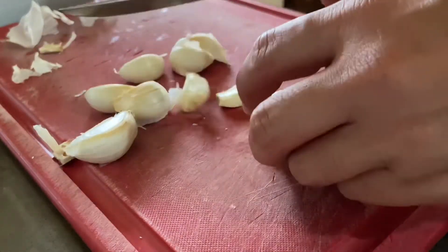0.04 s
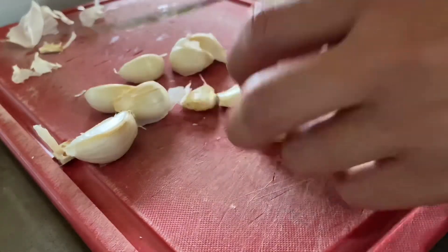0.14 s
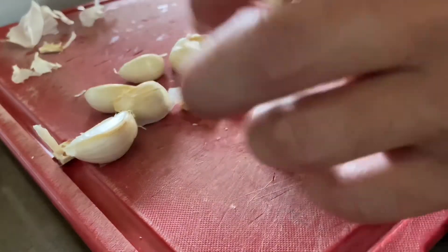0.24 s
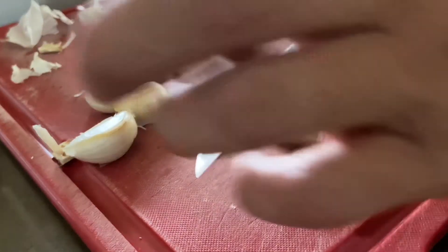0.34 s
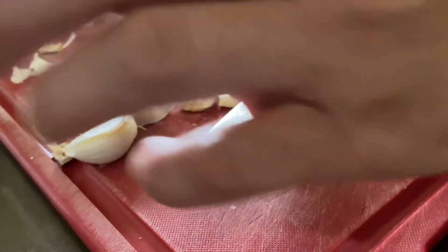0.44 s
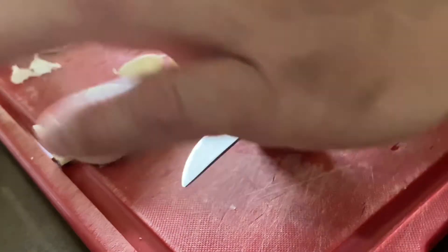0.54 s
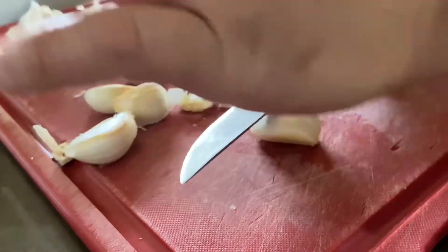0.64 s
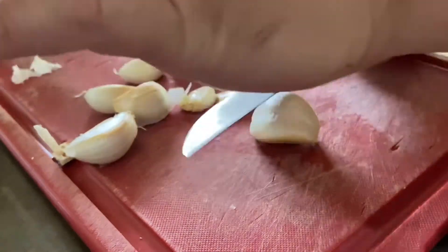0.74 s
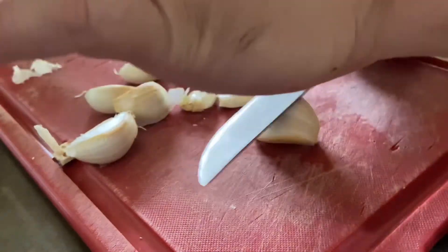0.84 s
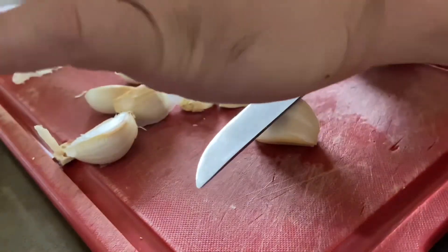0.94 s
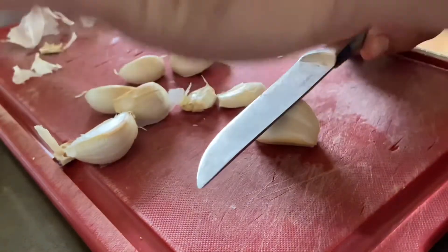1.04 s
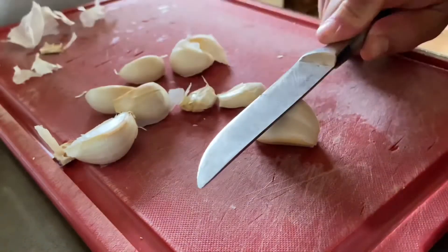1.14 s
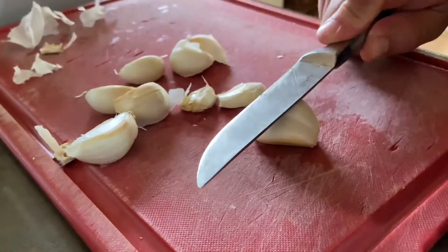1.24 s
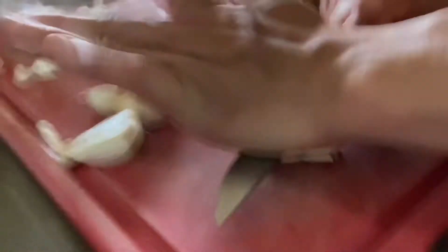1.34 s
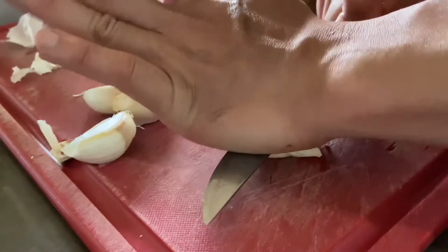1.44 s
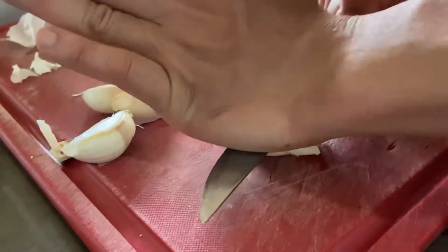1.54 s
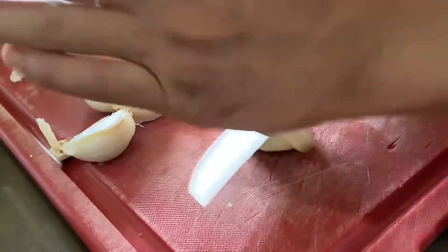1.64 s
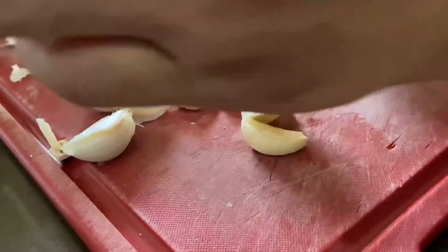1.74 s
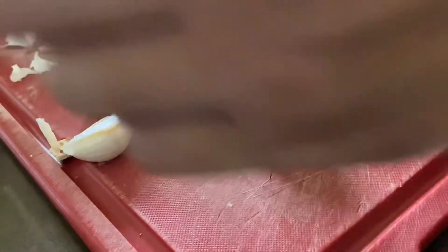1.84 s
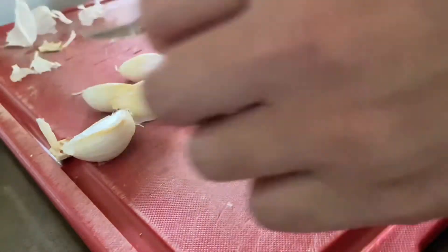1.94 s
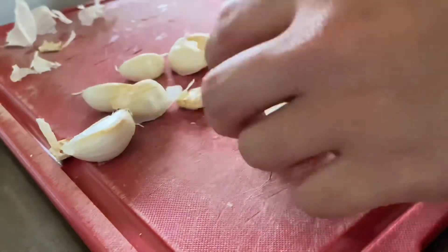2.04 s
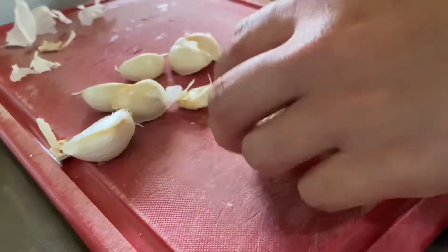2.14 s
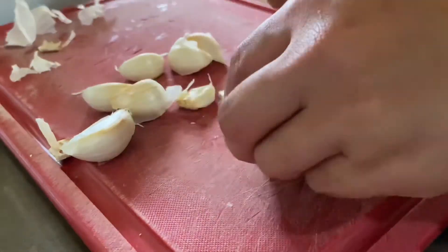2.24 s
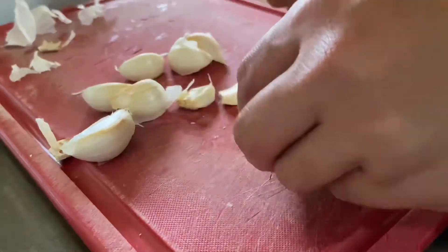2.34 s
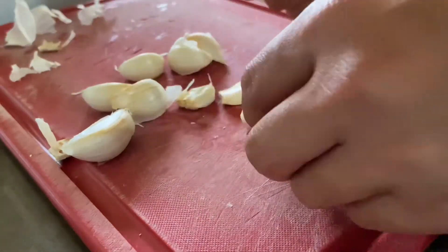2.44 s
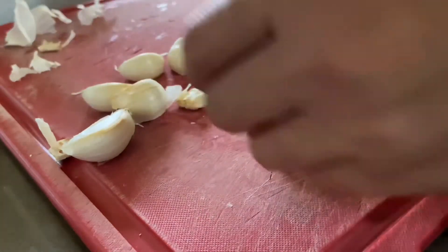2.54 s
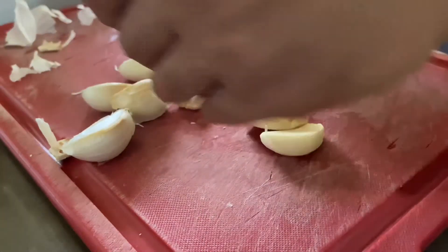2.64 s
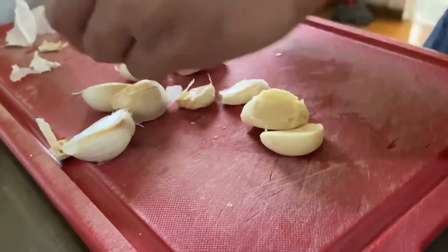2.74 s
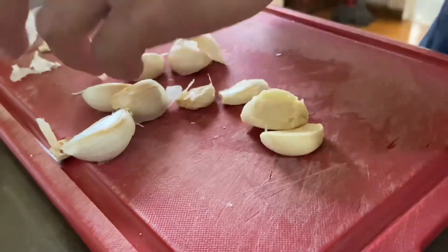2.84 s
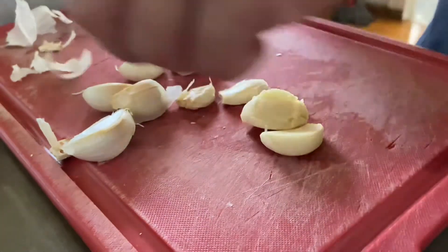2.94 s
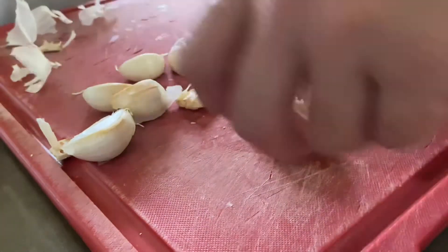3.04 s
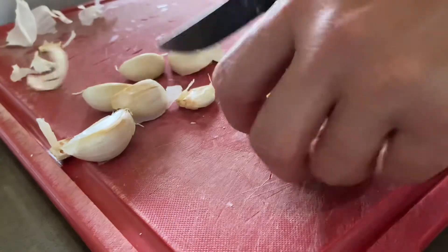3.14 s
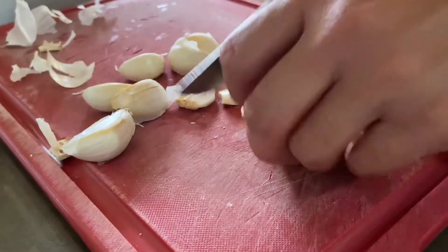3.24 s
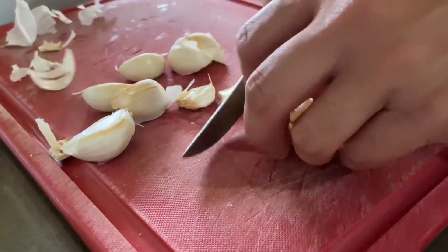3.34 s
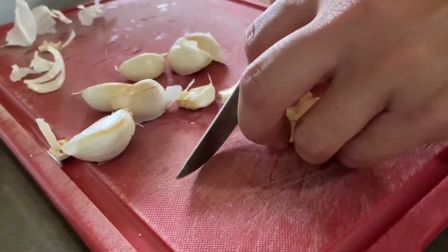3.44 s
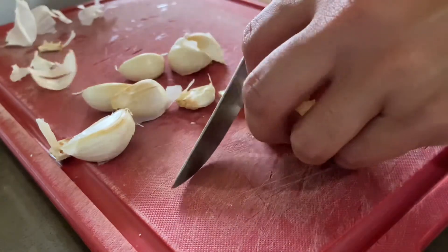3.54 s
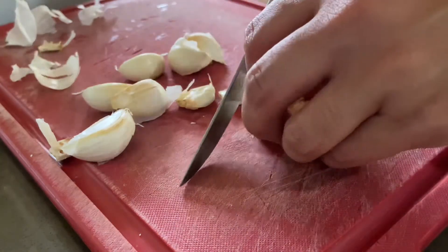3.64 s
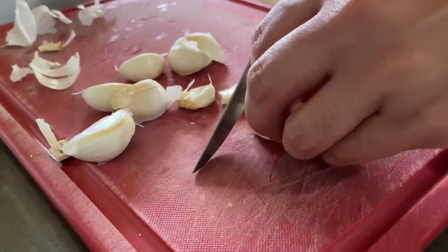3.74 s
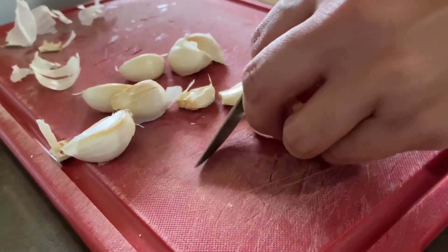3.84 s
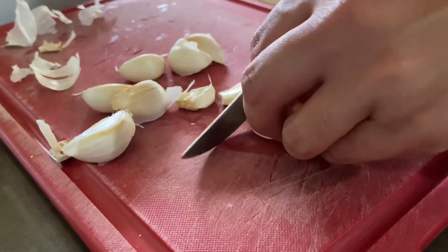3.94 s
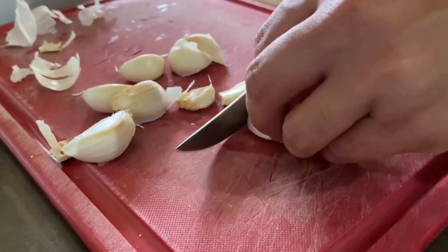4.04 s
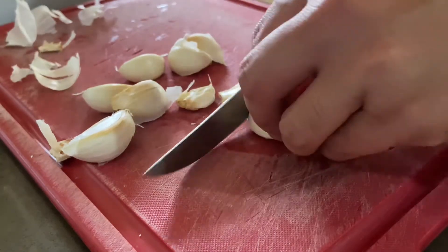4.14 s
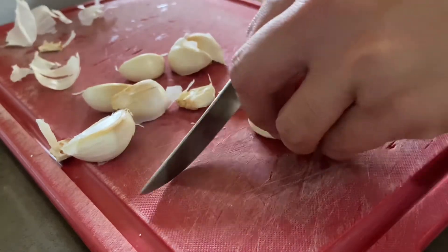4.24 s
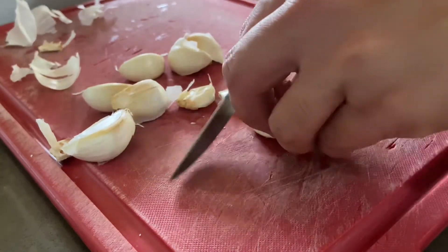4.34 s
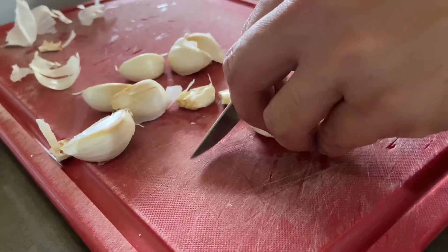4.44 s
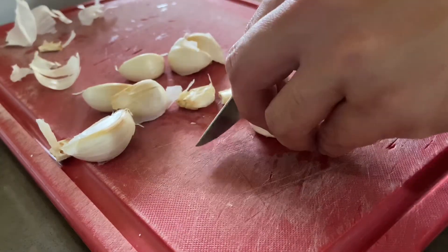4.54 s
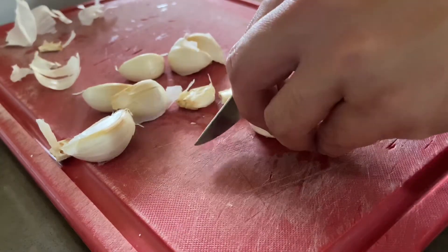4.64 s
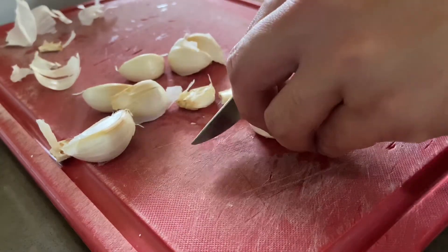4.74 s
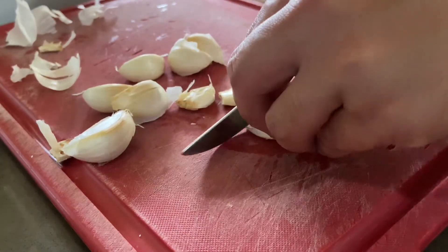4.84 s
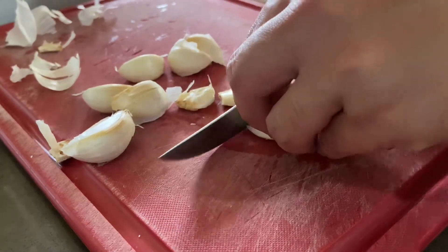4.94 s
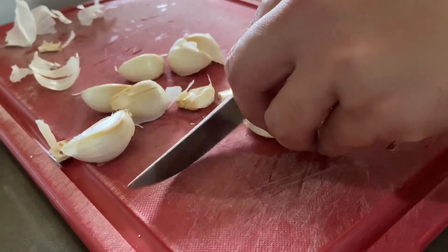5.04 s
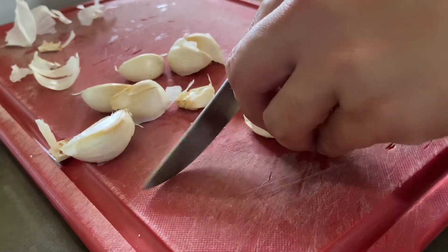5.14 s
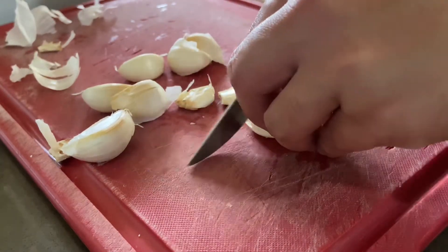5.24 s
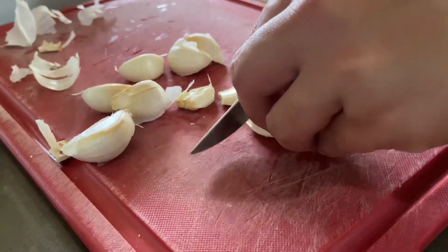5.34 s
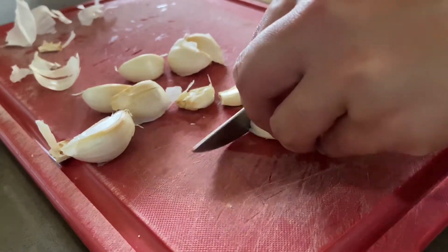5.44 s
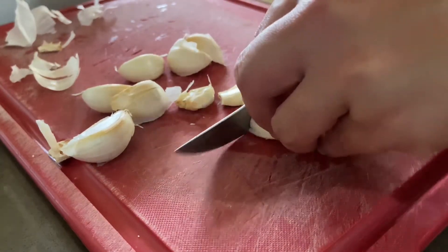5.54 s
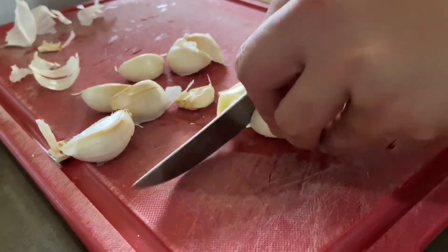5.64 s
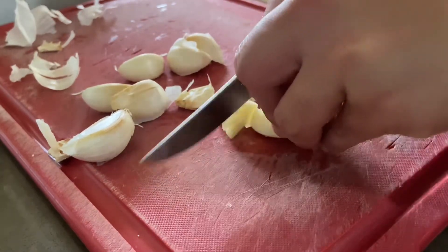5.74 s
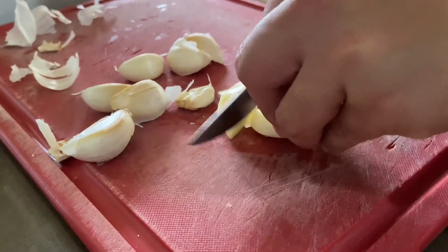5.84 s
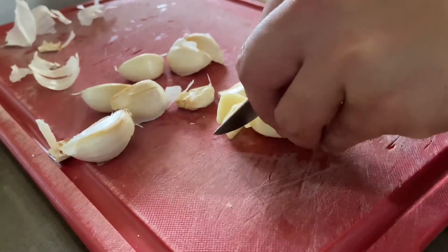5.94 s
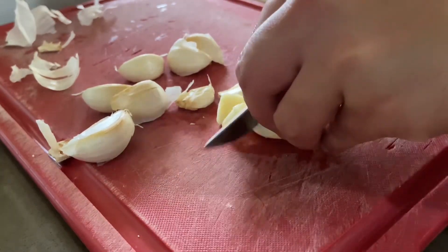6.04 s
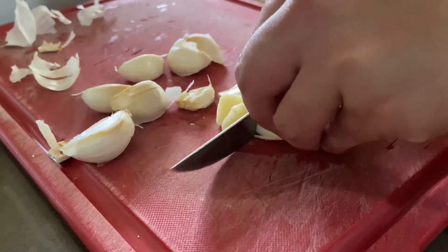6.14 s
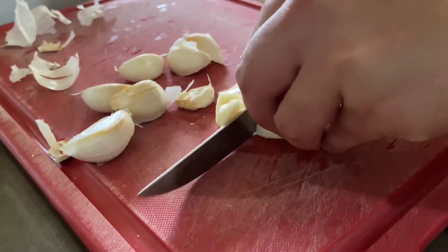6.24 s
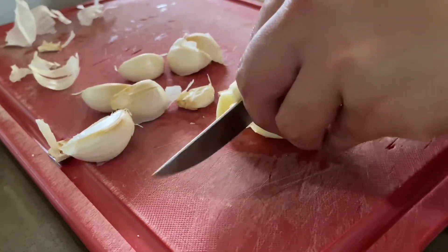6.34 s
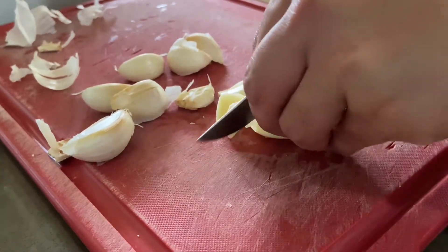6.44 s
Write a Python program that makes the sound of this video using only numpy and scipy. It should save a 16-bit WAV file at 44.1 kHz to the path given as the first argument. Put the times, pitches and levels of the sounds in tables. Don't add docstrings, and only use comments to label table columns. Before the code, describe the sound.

A quiet kitchen, heard very close to a plastic board, with faint low fridge hum, soft airy noise and counter rumble that gradually grow louder. A barely audible touch comes near 0.4 s. At 1.3 s a garlic clove is crushed: a tight run of dry cracks, a dull puff of air and a low counter thud, with a short room tail. From 1.5 to 2.9 s there are tiny papery ticks, gentle rubbing and very faint squeaks. At 3.3 s the blade knocks hard with a slight steely ring. Small clatters and a sharp fibre snap follow around 3.9 s, then a duller knock at 4.4 s. A crunchy cut lands at 4.8 s, then skin crackle at 5.0 s. The strongest chop hits at 5.4 s with wet snapping and scraping; another crunches and knocks at 6.0-6.1 s, before light rubbing fades into the hum.

```python
import sys
import numpy as np
from scipy import signal
from scipy.fft import rfft, irfft, next_fast_len
from scipy.io import wavfile
from scipy.ndimage import uniform_filter1d

SR = 44100
rng = np.random.default_rng(int(sys.argv[2]) if len(sys.argv) > 2 else 0)


def boost(x):
    u = np.asarray(x, float) / 20
    return 10 ** u


def dump(signal):
    limited = np.clip(np.atleast_2d(signal).T, -1, 1)
    pcm = np.round(limited * 32767).astype(np.int16)
    wavfile.write(sys.argv[1], SR, pcm)


N = 285327


def evened(x):
    return x / np.sqrt(np.mean(x ** 2) + 1e-20)


def read(points, hz):
    f, value = np.transpose(points)
    return np.interp(np.log(hz + 1), np.log(f + 1), value)


def add(mix, s, sound):
    part = mix[max(round(s * SR), 0):][:len(sound)]
    part += sound[:len(part)]


def colour(x, points, tilt_db=0., centre_hz=8000):
    size = next_fast_len(x.shape[-1], True)
    hz = np.fft.rfftfreq(size, 1 / SR)
    octaves = np.log2(np.maximum(hz / centre_hz, 1 / 4))
    gain = boost(read(points, hz) - tilt_db * octaves)
    return irfft(rfft(x, size) * gain, size)[..., :x.shape[-1]]


# f/Hz, coherence [-1 to 1]
COHERENCE = [(60, 1), (180, 0.68), (550, -0.035), (1650, -0.031), (4970, 0.57), (15000, -0.076)]


def wash(spectrum, patchy_db):
    frames, hz = N // 512 + 5, np.fft.rfftfreq(2048, 1 / SR)
    a, b, c, d, patches = rng.standard_normal((frames, 1025, 5)).T
    patches = uniform_filter1d(patches, 6, 0)
    patches = evened(uniform_filter1d(patches, 8, 1))
    same = np.clip(read(COHERENCE, hz), -1, 1)[:, None]
    left = a + 1j * b
    right = same * left + np.sqrt(1 - same ** 2) * (c + 1j * d)
    z = np.array([left, right]) * boost(read(spectrum, hz)[:, None] + patchy_db * patches)
    return evened(signal.istft(z, nperseg=2048, noverlap=1536)[1][:, :N])


# f/Hz, level/dB
HUM_LINES = [(118.4, -74.5), (360.7, -72.5), (522.2, -80.5), (1066, -85.5), (1244, -89), (1836, -98)]


def fridge_hum(waver_db=2.0, waver_rad=0.94):
    t = np.arange(N) / SR
    hum = np.zeros((2, N))
    for hz, db in HUM_LINES:
        slow = uniform_filter1d(rng.standard_normal(N), 3000)
        waver = evened(uniform_filter1d(slow, 3000))
        between_ports = np.array([[0], [1.3]]) * hz / 360
        phase = 2 * np.pi * hz * t + waver_rad * waver + between_ports
        hum += boost(db + 76 + waver_db * waver[::-1]) * np.sqrt(2) * np.sin(phase)
    return hum


# f/Hz, density level/dB per Hz
AIR_NOISE = [(120, -44), (200, -13), (260, -22.5), (360, -16), (442, -22.5), (513, -20), (900, -25.5),
             (1270, -31), (1900, -37.5), (2300, -42.5), (2900, -41), (5000, -43), (10000, -48.5),
             (16500, -43)]
# f/Hz, density level/dB per Hz
COUNTER_RUMBLE = [(12, -65), (20, -39.5), (34, -17), (48, -2), (69, 7), (86, -15.5), (102, -1.5), (123, 2),
                  (229, -2.5), (300, -24.5), (390, -45), (660, -120)]
# t/s, gain as hum level/dB, weight of the hands on the counter/dB
RECORDER_GAIN = [(0.0, -71.5, 10), (0.7, -72, 8.5), (1.33, -72, 7.5), (1.51, -63, 6), (1.85, -68.5, 8.5),
                 (2.23, -67.5, 7.5), (2.83, -66.5, 10.5), (3.299, -65.5, 6), (3.948, -64, 9), (4.9, -60, 7),
                 (5.26, -58, 4.5), (5.45, -57.5, 6.5), (5.86, -59.5, 9.5), (6.16, -57.5, 6),
                 (6.47, -59.5, 5.5)]


def background(air_db=4.5):
    t = np.arange(N) / SR
    s, gain_db, hands_db = np.transpose(RECORDER_GAIN)
    air = fridge_hum() + boost(air_db) * wash(AIR_NOISE, patchy_db=2.65)
    air_gain = boost(np.interp(t, s, gain_db))
    rumble_gain = boost(np.interp(t, s, gain_db + hands_db))
    return air_gain * air + rumble_gain * wash(COUNTER_RUMBLE, patchy_db=1.5)


def swells(rows, fade_db=20):
    t, power = np.arange(0, N + 64, 64) / SR, 0
    for s, rise, fall, *db in rows:
        away = np.maximum((s - t) / max(rise, .005), (t - s) / max(fall, .005))
        power = power + boost(np.array(db)[:, None] - fade_db * away) ** 2
    return [np.interp(np.arange(N) / SR, t, np.sqrt(row)) for row in power]


# f/Hz, level/dB
CRACK_SPECTRUM = [(300, -37.5), (1000, -13.5), (2000, -15.5), (3000, -12), (4200, -5.5), (5500, -3),
                  (7000, -3), (9000, 2), (11000, -1), (13000, -1), (15000, -4.5), (17000, -10)]
# f/Hz, level/dB
FLESH_SPECTRUM = [(600, -25.5), (1300, -9.5), (2200, -9), (3300, -10), (4800, 1), (6500, -2.5),
                  (9000, -14.5), (14000, -14)]
# f/Hz, level/dB
SCRAPE_SPECTRUM = [(300, -23.5), (900, -1), (1500, 2), (2100, -21), (2700, -6.5), (3800, -7.5), (5000, -12),
                   (6500, -16.5), (9000, -30), (14000, -36)]
# strongest t/s, rise t/s, fall t/s, hiss level/dB, scrape level/dB
RUB_STROKES = [(.05, 0.031, 0.071, -64.5, -75), (1.334, 0.019, 0.091, -49.5, -45),
               (1.45, 0.063, 0.15, -68, -68), (1.64, 0.17, 0.053, -63, -70),
               (1.82, 0.078, 0.044, -66.5, -74), (2.261, 0.06, 0.02, -55, -67),
               (2.38, 0.24, 0.095, -72, -76), (2.6, 0.11, 0.19, -72.5, -85.5),
               (2.86, 0.085, 0.31, -77, -71.5), (3.24, 0.15, 0.62, -72, -72), (3.87, 0.054, .3, -67, -64.5),
               (3.97, 0.068, 0.022, -66, -53), (4.1, 0.12, 0.14, -63, -58),
               (4.8, 0.017, 0.12, -49.5, -38.5), (4.941, 0.15, 0.072, -51.5, -75),
               (5.17, 0.13, 0.16, -63.5, -56), (5.431, 0.0071, 0.024, -31.5, -24.5),
               (5.41, 0.014, 0.061, -42.5, -35), (5.52, 0.076, 0.26, -77, -40.5),
               (5.6, 0.13, 0.064, -51.5, -45.5), (6.015, 0.017, 0.18, -55.5, -50),
               (6.076, 0.064, 0.019, -51, -47.5), (6.17, 0.1, 0.081, -50.5, -67.5),
               (6.24, 0.28, 0.019, -55.5, -76)]
# strongest t/s, rise t/s, fall t/s, crunch level/dB
CLOVE_CUTS = [(1.36, 0.031, 0.23, -51), (3.85, 0.015, 0.11, -61), (3.96, 0.026, 0.19, -50),
              (4.04, 0.018, 0.14, -64), (4.79, 0.0087, .05, -48), (5.4, .02, 0.049, -46),
              (5.413, .015, .03, -44), (5.426, .012, .03, -44), (6.002, .006, 0.017, -50.5),
              (6.018, .012, 0.027, -45), (6.032, .012, 0.054, -39.5), (6.045, .03, 0.061, -44),
              (6.074, .025, 0.013, -41)]


def rubs(grains_per_s=6000, lumpy_db=3):
    loudness = boost(lumpy_db * np.minimum(rng.exponential(1, N), 4))
    grains = loudness * (rng.random(N) < grains_per_s / SR)
    tears = evened(grains * rng.standard_normal(N))
    smooth = rng.standard_normal(N)
    hiss = evened(colour(tears + 0.9 * smooth, CRACK_SPECTRUM))
    crunch = evened(colour(tears[::-1] + 0.54 * smooth, FLESH_SPECTRUM))
    scrape = evened(colour(smooth[::-1] + 0.65 * tears, SCRAPE_SPECTRUM))
    hiss_gain, scrape_gain = swells(RUB_STROKES)
    crunch_gain = swells(CLOVE_CUTS)[0]
    return hiss_gain * hiss + scrape_gain * scrape + crunch_gain * crunch


HOLLOW_HZ, HOLLOW_OCTAVES = 1120, .15


def struck(events, modes, length_s, centre_hz, spread, spread_db, rise, twin_db):
    out, t = np.zeros(N), np.arange(round(length_s * SR)) / SR
    hz, mode_db, t60 = np.transpose(modes + modes)[:, :, None]
    twin = (np.arange(len(hz)) >= len(modes))[:, None]
    hollow = np.exp(-(np.log2(hz / HOLLOW_HZ) / HOLLOW_OCTAVES) ** 2)
    sign = (-1.) ** np.arange(len(hz))[:, None]
    swell = 1 - np.exp(-t * hz / rise)
    chance = rng.standard_normal((len(events), 2, len(hz), 1))
    for (s, db, bright_db, ring, *hollow_db), (a, b) in zip(events, chance):
        level_db = mode_db + twin * twin_db + spread_db * b
        level_db = level_db + bright_db * np.log2(hz / centre_hz) + sum(hollow_db) * hollow
        pitch = hz * (1 + spread * a * (0.3 + twin))
        decay = boost(level_db - 60 * t / (t60 * max(ring, .2)))
        blow = (sign * swell * decay * np.sin(2 * np.pi * pitch * t)).sum(0)
        add(out, s, boost(db + 3.5) * blow / abs(blow).max())
    return out


# f/Hz, level/dB, decay t60/s
BOARD_MODES = [(622, -3.5, 0.021), (842, -10, 0.08), (882.3, -4.3, 0.12), (1048, -6.5, 0.063),
               (1165, -6.5, 0.06), (1366, -2.5, 0.056), (1350, -2, 0.02), (1632, 9, 0.027),
               (2067, -15.5, 0.077), (2654, -9.5, 0.049), (2874, -15.5, 0.012), (3100, 2, 0.033),
               (3654, -15.5, 0.06), (3836, -1, 0.017), (3906, -2.5, 0.032), (4520, -6.5, 0.018),
               (4680, -21.5, 0.081), (6295, -10, 0.019), (7720, -30, 0.0023)]
# t/s, peak level/dB, brightness/dB per octave, ring [factor], hollow modes level/dB
BOARD_KNOCKS = [(0.378, -45, -17.5, 1.05, -5), (0.411, -56, -41, 1.1, -12), (3.3327, -9.5, 2.5, 0.47, 4.5),
                (3.3623, -23.5, -2, .95, 1.5), (3.84, -40, -13.5, 0.601, -4), (3.8507, -30, -7.5, 0.71, 8),
                (3.8744, -40, -3, 0.7, -2), (3.894, -38, -6, 0.45, 11.5), (3.9076, -35.5, -4, 0.89, -1),
                (3.921, -50, -7, .7, 7), (3.954, -33, 7, 0.46, -5), (4.004, -25.5, 3.5, 0.55, -5),
                (4.4056, -17, -5.5, 0.62, 6), (4.7889, -29, 0.5, .95, 4), (4.8212, -8.5, 0.14, 0.55, -2),
                (4.8545, -24.5, -16, 0.62, -8), (5.2571, -28, -8, 0.6, 6.5), (5.3913, -36, -10.5, 0.46, -2),
                (5.4102, -40, -4.5, 0.65, 0.5), (5.4318, -2, 1.5, 0.77, -4.5),
                (5.4631, -32, 4.5, 0.3, -0.5), (6.002, -44.5, -22, 0.66, 3.5),
                (6.0314, -32, -2, 0.66, -0.5), (6.0812, -6, -1, 0.79, 0.5), (6.1096, -35, -4.5, 0.81, -4)]


def board_knocks():
    return struck(BOARD_KNOCKS, BOARD_MODES, length_s=.1, centre_hz=1800, spread=0.029, spread_db=-0.5,
                  rise=0.53, twin_db=-2.0)


# f/Hz, level/dB
RADIATED_SPECTRUM = [(400, -31.5), (760, -7.5), (875, 2.5), (1020, -10.5), (1330, 3.5), (1550, 4),
                     (2050, -14.5), (2700, -11.5), (3100, -9), (3420, -15), (3630, -2.5), (3850, -7),
                     (4200, -5), (4600, -10), (6000, -12), (9000, -28.5), (14000, -41)]


def radiated(gain_db=14):
    out, click = np.zeros(N), signal.unit_impulse(1024, 512)
    for s, db, bright_db, ring, hollow_db in BOARD_KNOCKS:
        blur = colour(click, RADIATED_SPECTRUM, -bright_db, 1800)
        add(out, s - 512 / SR, boost(db + gain_db) * blur / np.linalg.norm(blur))
    return out


def snaps(rows, t60, burst_db):
    out, t = np.zeros(N), np.arange(2048) / SR - .004
    burst = boost(burst_db - 60 * t / max(t60, .002))
    rattle = boost(-18 - 60 * t / 0.021)
    shape = (burst + rattle) * np.clip(t / 0.00017, 0, 1)
    spike = 4.3 * np.exp(-((t - .0003) / .00002) ** 2)
    for (s, db, dull_db), noise in zip(rows, rng.standard_normal((len(rows), len(t)))):
        crack = colour(spike + noise * shape, CRACK_SPECTRUM, dull_db)
        add(out, s - .004, boost(db + 3.0) * crack / abs(crack).max())
    return out


def edge_ticks(edge_db=-3, per_bright=0.96, dull_db=17.5):
    rows = []
    for s, db, bright_db, ring, hollow_db in BOARD_KNOCKS:
        rows.append((s, db + edge_db + per_bright * bright_db, dull_db))
    return snaps(rows, t60=0.0049, burst_db=-3)


# t/s, peak level/dB, dullness/dB per octave
SKIN_TICKS = [(0.3785, -47.5, 0), (1.5525, -37, 6), (1.5795, -29.5, 0), (1.6176, -29, -0.5),
              (1.6371, -39.5, -4), (1.6688, -43, -18.5), (2.1854, -44, -6), (2.2247, -33, -1),
              (2.2974, -41, 1), (2.3578, -44, -21), (2.5705, -47.5, -3), (2.726, -47.5, -1.5),
              (2.8449, -33, 8), (3.2924, -45.5, -4), (3.3326, -29, -12.5), (3.8985, -30.5, 2.5),
              (3.906, -39, 2), (3.9419, -25.5, 2.5), (4.1579, -23, -10), (4.1642, -29, -8),
              (4.948, -32, -7.5), (4.9887, -15, -3), (5.0008, -33.5, 4), (5.2552, -31, -1),
              (5.2948, -35, 1), (5.5522, -16, -8.5), (5.606, -27.5, -7.5), (5.6361, -38, -15),
              (6.2678, -28, -20.5)]


def skin_ticks():
    return snaps(SKIN_TICKS, t60=0.0029, burst_db=-6)


# f/Hz, level/dB, decay t60/s
COUNTER_MODES = [(56.7, -3.1, 0.26), (80, -14, 0.15), (107.5, -6.5, 0.18), (161.5, -3, .08),
                 (235.3, -11.5, 0.04), (299.4, -32.5, 0.038), (460, -25.5, 0.02)]
# t/s, peak level/dB, brightness/dB per octave, ring [factor]
COUNTER_THUDS = [(.385, -41.5, -0.5, 0.59), (1.327, -17.5, 15.5, 0.56), (1.333, -15, -2, 0.54),
                 (1.44, -37, 5.5, 0.64), (3.335, -38, 11.5, 1), (3.861, -44.5, 5.5, 0.95),
                 (3.891, -45.5, 10.5, 0.78), (4.008, -34, -0.5, 0.8), (4.4, -39, 9, 0.99),
                 (4.797, -37, 6, 1), (4.912, -35.5, -19, 0.36), (5.26, -37.5, 13.5, 0.58),
                 (5.43, -31.5, 7.5, 0.76), (5.49, -29.5, 3, 0.86), (5.59, -37.5, -6.5, 1),
                 (6.03, -39.5, -1, 1), (6.08, -39, 12, 0.58), (6.145, -37.5, -7.5, 0.7)]


def counter_thuds():
    return struck(COUNTER_THUDS, COUNTER_MODES, length_s=.25, centre_hz=90, spread=0.081, spread_db=2.5,
                  rise=0.091, twin_db=-0.5)


# t/s, peak level/dB, dullness/dB per octave
CRUSH_CRACKS = [
    (1.3194, -25.5, 4),
    (1.3235, -11.5, -0.5),
    (1.3245, -0.5, 0),
    (1.3256, -6.5, -4.5),
    (1.3268, -7.5, 3),
    (1.3288, -2.5, 7.5),
    (1.3322, -18, 1.5),
    (1.3821, -33.5, -14),
]


def crush_cracks():
    return snaps(CRUSH_CRACKS, t60=0.00087, burst_db=-4)


# f/Hz, level/dB
SLAP_SPECTRUM = [(200, -25.5), (500, -6.5), (1000, -8), (1600, -2), (2600, -4.5), (4500, -3.5),
                 (7000, -16.5)]
# t/s, level/dB, decay t60/s
FLAT_SLAPS = [
    (1.326, -9.5, 0.041),
    (2.841, -43.5, 0.033),
]


def slaps():
    out, t = np.zeros(N), np.arange(4096) / SR - .01
    for (s, db, t60), noise in zip(FLAT_SLAPS, rng.standard_normal((len(FLAT_SLAPS), len(t)))):
        decay = np.clip(t / 0.00049, 0, 1) * boost(-60 * t / max(t60, .005))
        add(out, s - .01, boost(db) * evened(colour(noise, SLAP_SPECTRUM)) * decay)
    return out


# t/s, length t/s, f/Hz, bandwidth f/Hz, level/dB
SQUEAK_TONES = [
    (1.52, .1, 3230, 90, -66),
    (1.62, .13, 3260, 120, -74),
    (2.066, .025, 6970, 80, -76),
    (5.11, .15, 2570, 330, -59),
    (4.42, .13, 3620, 170, -62),
]


def squeaks():
    out = np.zeros(N)
    chance = rng.standard_normal((len(SQUEAK_TONES), 2, 8000))
    for (s, length, hz, width_hz, db), (a, b) in zip(SQUEAK_TONES, chance):
        t = np.arange(round(length * SR)) / SR
        r = np.exp(-np.pi * width_hz / SR)
        fuzz = signal.lfilter([1], [1, -2 * r, r * r], a + 1j * b)[-len(t):]
        whistle = evened((fuzz * np.exp(2j * np.pi * hz * t)).real)
        add(out, s, boost(db) * whistle * signal.windows.tukey(len(t), .6))
    return out


# f/Hz, level/dB, decay t60/s
BLADE_MODES = [(8080, -15, 0.12), (9000, -6.5, .06), (10080, -13.5, .15), (11090, -10, 0.15),
               (12040, 1, 0.098), (14440, 4, 0.084)]
# t/s, peak level/dB, brightness/dB per octave, ring [factor]
BLADE_PINGS = [
    (3.333, -37.5, 3, 1.4),
    (4.406, -56, -7, 0.66),
]


def blade_pings():
    return struck(BLADE_PINGS, BLADE_MODES, length_s=.1, centre_hz=10000, spread=0.0023, spread_db=3.0,
                  rise=.9, twin_db=-25.0)


# t/s, peak level/dB, dullness/dB per octave
FIBRE_SNAPS = [(3.8405, -47, 7.5), (3.8487, -35, 4), (3.9279, -43.5, -8.5), (3.951, -0.5, -8.5),
               (4.0238, -20.5, 0), (4.03, -10, 2), (4.7885, -19.5, 1), (4.7975, -13, -10.5),
               (4.8066, -10.5, -14), (4.8097, -6, -2), (4.82, -2.5, -4.5), (4.8516, -1.5, -4.5),
               (4.8654, -12.5, -10.5), (4.8761, -13, -12), (5.3817, -31, 5), (5.3916, -30, 7.5),
               (5.4035, -32, -6), (5.4126, -22.5, 2), (5.4248, -13, 2.5), (5.4298, -1, 3), (5.4272, -15, 4),
               (5.4376, -11, 5), (5.4418, -15, -9), (5.4461, -14, -2.5), (5.4491, -19.5, -4),
               (6.0005, -34.5, 6.5), (6.017, -40.5, 6), (6.0322, -23, -12), (6.0775, 6.5, -16),
               (6.0795, -9, -7), (6.0835, -16.5, 0.5)]


def fibre_snaps():
    return snaps(FIBRE_SNAPS, t60=.007, burst_db=-9)


# f/Hz, left minus right level/dB
PORT_SHADE = [(200, 6), (400, -3.5), (800, 2.5), (1500, 9.5), (3300, 13), (5500, 15), (7500, 0),
              (11000, -0.1)]
# f/Hz, phase [radians]
BOARD_PHASE = [(300, 0.43), (950, 0.62), (1400, 1), (2000, 3.06), (2800, 8.4), (3700, 12.6), (6000, 19)]
# f/Hz, phase [radians]
COUNTER_PHASE = [(50, .15), (120, .35), (250, 1.9), (500, 0.62)]
AIR_LAG = 12


def ports(x, lag=0, lead=((1, 0), (2, 0)), shade=1):
    size = next_fast_len(N, True)
    hz = np.fft.rfftfreq(size, 1 / SR)
    half = boost(shade * read(PORT_SHADE, hz) / 2)
    left = half * np.exp(1j * read(lead, hz) - 2j * np.pi * hz * lag / SR)
    return irfft(rfft(x, size) * np.array([left, 1 / half]), size)[:, :N]


# f/Hz, decay t60/s
KITCHEN_DECAY = [(200, 0.74), (700, 0.56), (1500, 0.62), (3500, 0.5), (7000, 0.5), (12000, 0.13)]
# f/Hz, level/dB
ROOM_SHARE = [(60, -29), (200, -12.5), (900, -3), (3500, -9.5), (8000, -19.5), (13000, -22)]


def kitchen(x):
    taps = np.zeros((2, SR))
    at = np.arange(140, SR - 20, 20) + rng.integers(0, 20, (2, (SR - 141) // 20))
    np.put_along_axis(taps, at, rng.choice([-1., 1.], at.shape), 1)
    hz, t, z = signal.stft(taps, SR, nperseg=256)
    decay = boost(-60 * t / read(KITCHEN_DECAY, hz)[:, None])
    tail = signal.istft(z * decay, SR, nperseg=256)[1]
    tail = colour(tail / np.linalg.norm(tail[0]), ROOM_SHARE)
    return signal.fftconvolve(x[None], tail, axes=1)[:, :N]


def scene():
    floor = background()
    cracks = edge_ticks() + skin_ticks() + crush_cracks() + fibre_snaps()
    garlic = rubs() + cracks + squeaks() + blade_pings()
    board, counter, palm = board_knocks(), counter_thuds(), slaps()
    near = ports(garlic, lag=AIR_LAG)
    near = near + ports(board + palm, lead=BOARD_PHASE, shade=.6)
    near = near + ports(counter, lead=COUNTER_PHASE, shade=.3)
    return near + kitchen(garlic + 0.17 * board + 0.24 * palm + radiated() + counter) + floor


# f/Hz, level/dB
PORT_RESPONSE = [(60, 0), (6000, -3), (8200, 2), (9500, 3), (11000, 1.5), (12300, 1.5), (13000, -4),
                 (14500, -5), (15300, -12), (16400, -19), (17000, -60)]
# f/Hz, level/dB
PORT_DIFFERENCE = [(3800, 1.5), (5200, 0.5), (6500, -5), (8500, -23), (15000, -23)]


def capsule(x):
    size = next_fast_len(N, True)
    hz = np.fft.rfftfreq(size, 1 / SR)
    late = np.exp(-2j * np.pi * hz * AIR_LAG / SR)
    left, right = rfft(x, size) * boost(read(PORT_RESPONSE, hz))
    common = (left / late + right) / 2
    apart = (left / late - right) / 2 * boost(np.minimum(read(PORT_DIFFERENCE, hz), 0))
    return irfft(np.array([(common + apart) * late, common - apart]), size)[:, :N]


def top_cut(x):
    return signal.sosfilt(signal.butter(12, 17000, fs=SR, output="sos"), x)


def record(dry, bass_cut_hz=42, ceiling=.8):
    rounded = ceiling * np.tanh(dry / ceiling)
    high_pass = signal.butter(3, bass_cut_hz, "high", fs=SR, output="sos")
    finished = capsule(signal.sosfilt(high_pass, rounded))
    return top_cut(finished)


dry = scene()
out = record(dry)
dump(out)
```